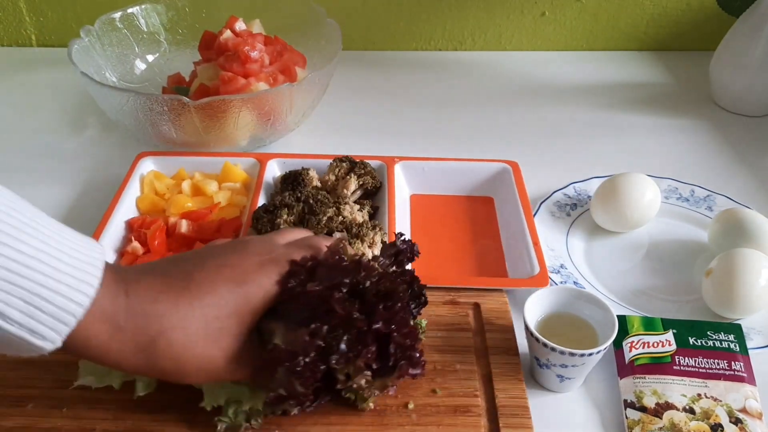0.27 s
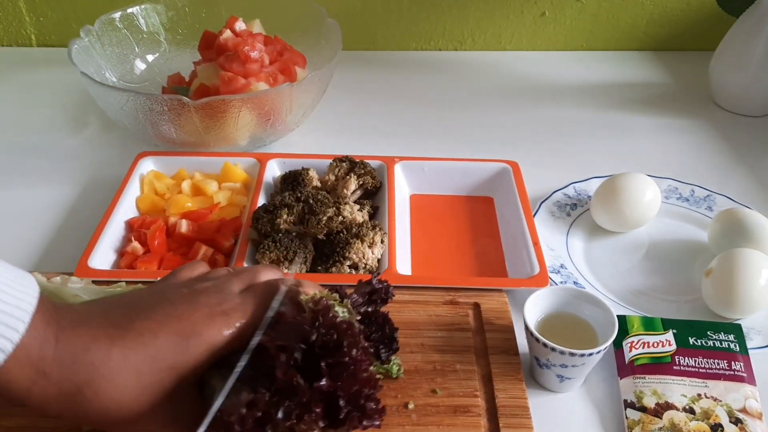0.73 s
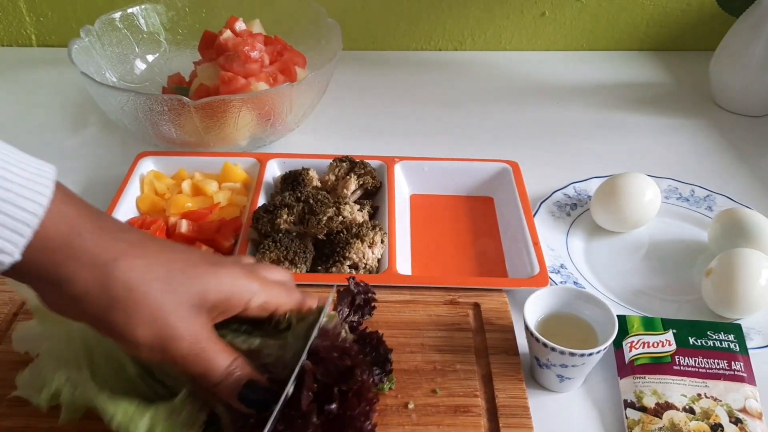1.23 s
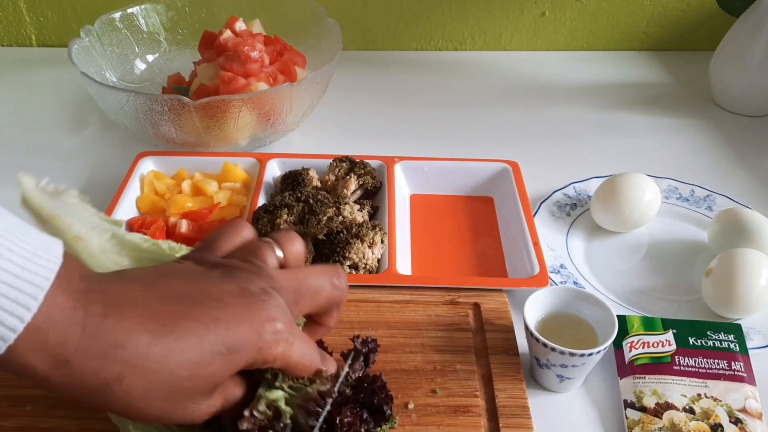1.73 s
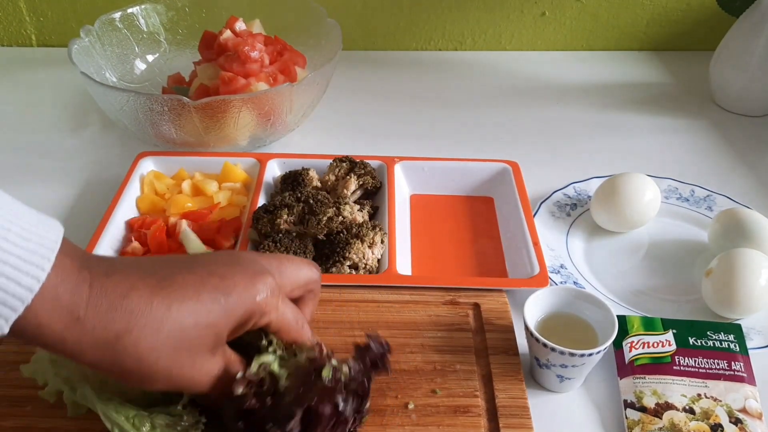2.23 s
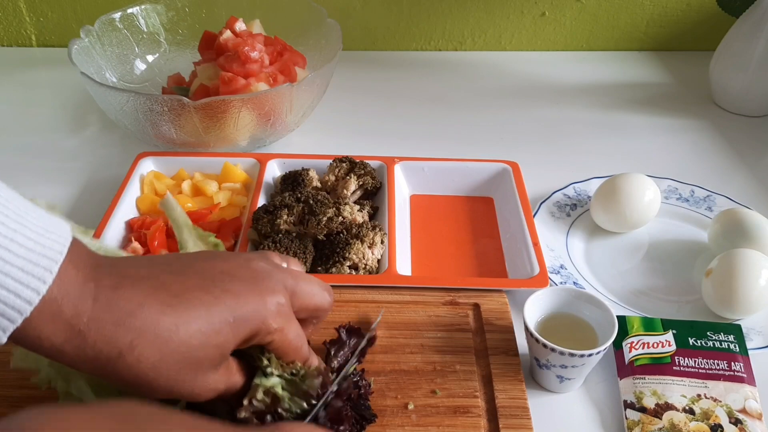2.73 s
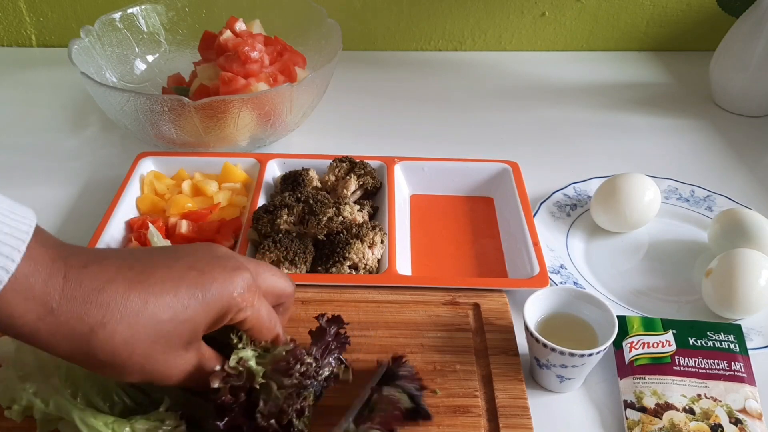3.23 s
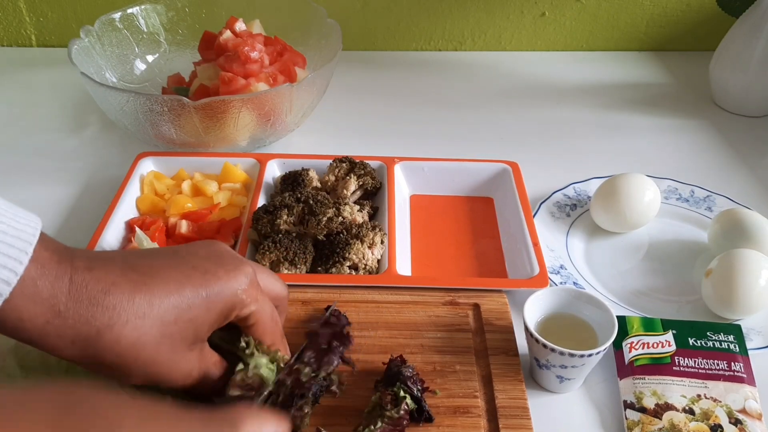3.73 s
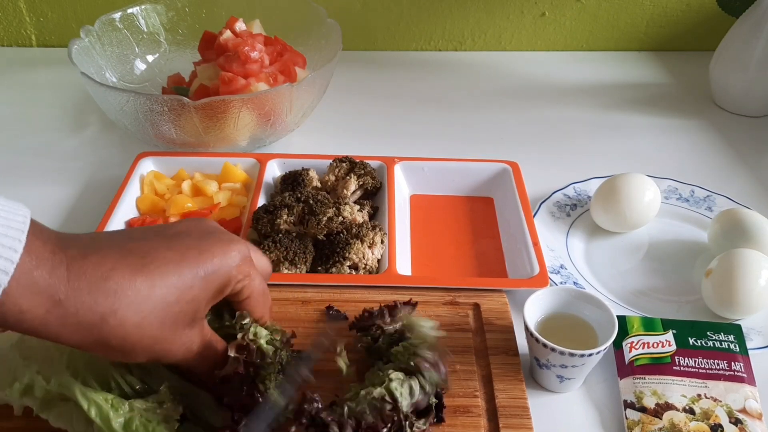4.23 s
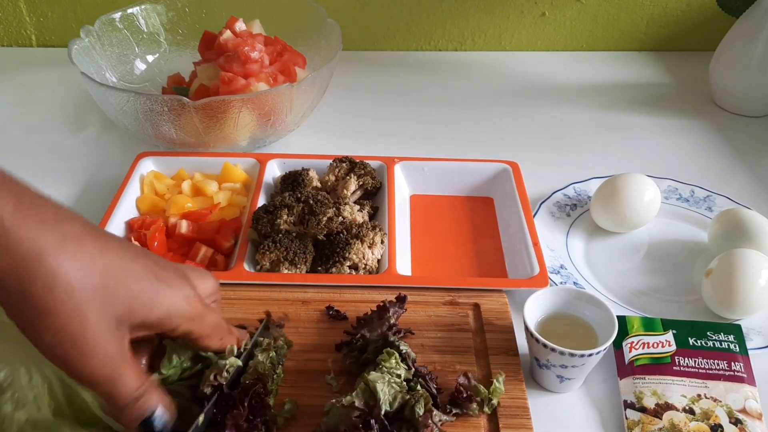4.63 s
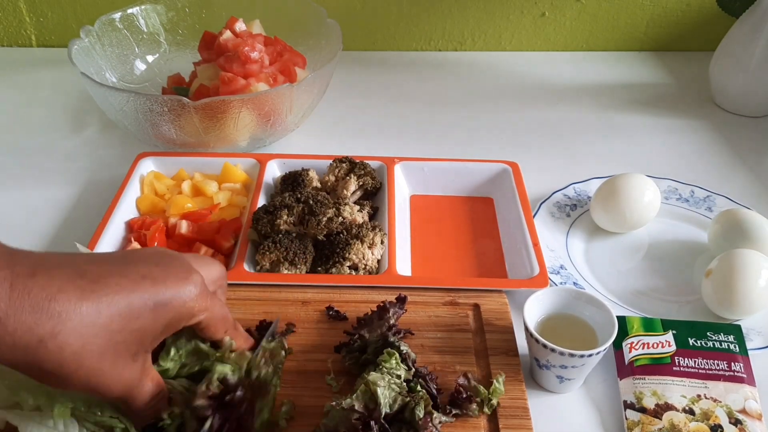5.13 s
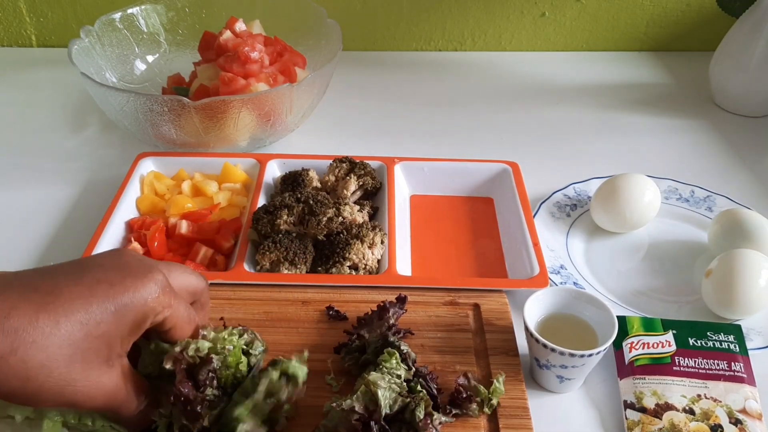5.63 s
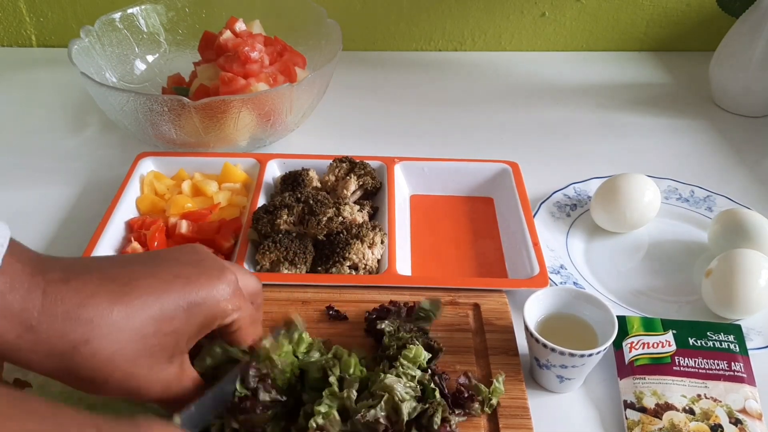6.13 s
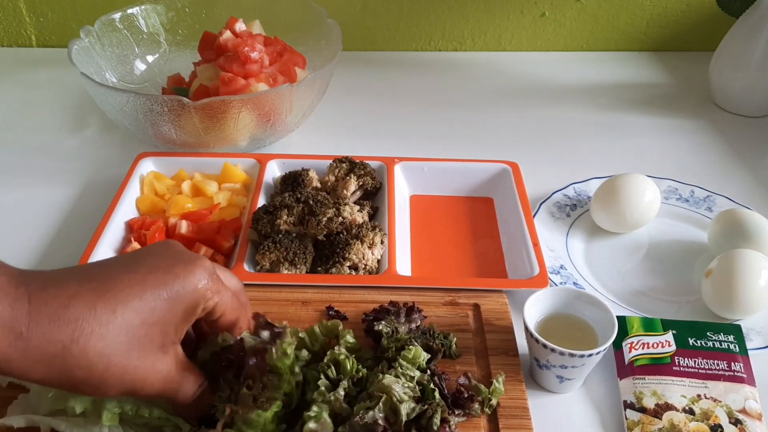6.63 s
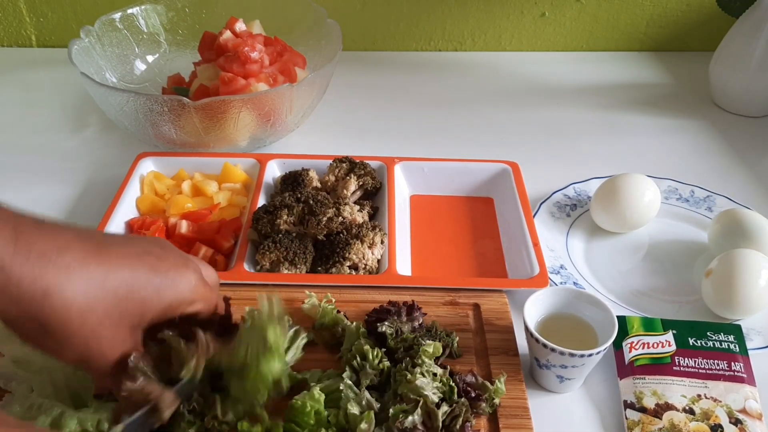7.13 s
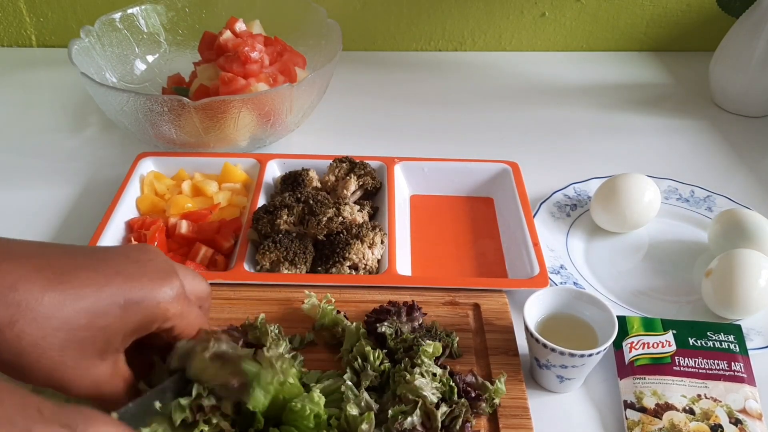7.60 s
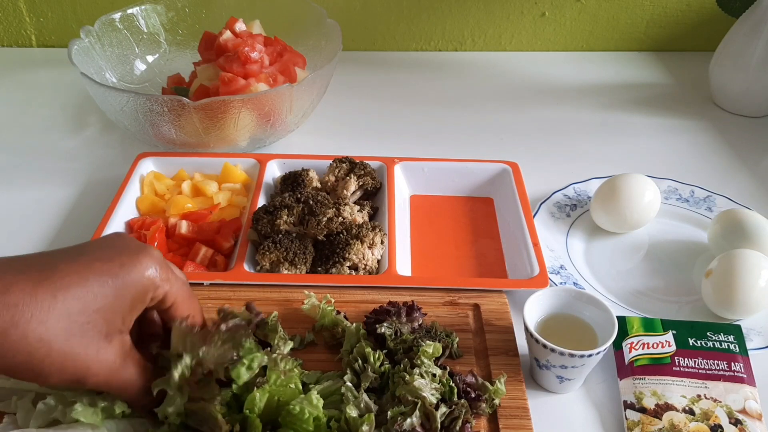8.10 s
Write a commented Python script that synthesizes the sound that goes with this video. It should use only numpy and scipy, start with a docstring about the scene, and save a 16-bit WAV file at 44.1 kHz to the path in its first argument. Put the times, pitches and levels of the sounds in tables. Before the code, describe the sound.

In a small kitchen, heard close in stereo with short bright reflections, a faint steady low appliance hum runs throughout, dipping briefly near 1 s. At 0.05-0.2 s a lettuce head lands on a wooden board: a fast cluster of hollow knocks, leaf crackle and a brief scrape. From 0.4 to 1.9 s come only soft rustles, light crunches and isolated ticks. Strokes strengthen from 2.1 s, crunchy at 2.9 s, with short blade rasps at 3.2 and 4.15 s and a hard clack on wood at 3.7 s, crunching again at 3.9 s. After a quieter stretch, quick crisp slices run from 4.9 to 6.6 s, snapping and tearing over dull board rumble, with a strong rasp at 5.9 s and dense crunch around 6.3-6.5 s. A short scrape at 6.87 s leads into near quiet and a very faint steel rub around 7.1 s. From 7.7 s, loud juicy stalk crunches peak near 8.1 s, then ease away.

```python
"""Slicing crisp lettuce

A head of lettuce is put down on a wooden board in a small kitchen and sliced with a knife.
Each stroke is a crackle of random clicks with snaps, ticks and tears, and a dull rumble of the board.
Blows ring the modes of the wood, the dragged blade rasps by stick and slip, wet leaves make it sing.
An appliance hums throughout, as drifting harmonics with one brief dip, over filtered noise for room air."""
import sys
import numpy as np
from scipy import signal
from scipy.fft import rfft, irfft
from scipy.io import wavfile
from scipy.ndimage import map_coordinates

SR = 44100
rng = np.random.default_rng(int(sys.argv[2]) if len(sys.argv) > 2 else 0)


def materialize(psi):
    """Save the field psi as 16-bit PCM at rate SR to the path in sys.argv[1].

    A 1-D psi becomes a single channel; in a 2-D psi each row is a channel.
    """
    bounded = np.clip(np.atleast_2d(psi).T, -1, 1)
    quanta = np.round(bounded * 32767).astype(np.int16)
    wavfile.write(sys.argv[1], SR, quanta)


N = 368676
TIME = np.arange(N) / SR

# Levels in the tables are relative: each source adds its own trim.
# the appliance motor: multiple_of_speed, level_db
MOTOR_HARMONICS = [(3, -72), (4, -64), (5, -68.5), (6, -49), (7, -71)]
MOTOR_HZ = 49.05   # mean speed
HUM_DIP_DB, HUM_DIP_AT_S, HUM_DIP_S = -3.5, 1.0, 0.34   # the hum dips briefly: depth, moment, half-length
# colour of the still room air: frequency_hz, level_db
AIR_COLOUR = [(25, -22), (50, -7), (110, -5.5), (200, 0), (330, 5.5), (450, -5), (700, -23.5),
              (1500, -21.5), (4000, -29.5), (9000, -26), (15000, -32.5)]

# decay of the kitchen: frequency_hz, t60_s
KITCHEN_DECAY = [(80, 0.23), (300, 0.48), (1000, 0.41), (3000, 0.4), (8000, 0.36), (15000, 0.24)]
EARLY_ECHO, EARLY_S = 1.5, 0.0055   # strength and fade of the first reflections off worktop, dishes and wall
LEFT_DB = 0.55   # the left is raised by this, the right lowered
CUTOFF_HZ = 15900
# spots along the blade, by the lag of their direct sound on the right: lag_s
SPOT_LAGS_S = [.00011, .00016, .0002]

# pushes of blade, hand or board into the leaves (the three moments are put in order of time):
# start_s, hardest_s, end_s, crisp_crackle_db, rib_crunch_db, board_rumble_db
STROKES = [(0.0, 0.006, 0.067, -54.5, -46.5, -70), (0.107, 0.124, 0.19, -39.5, -44, -63),
           (0.385, 0.46, 0.55, -65, -55.5, -69), (0.787, 0.824, 0.87, -64.5, -64, -76.5),
           (0.933, 1.071, 1.19, -60, -57, -74), (1.232, 1.293, 1.327, -55, -50.5, -74),
           (1.445, 1.477, 1.67, -55.5, -51, -64), (1.875, 1.919, 2.037, -50.5, -49, -55.5),
           (2.111, 2.246, 2.317, -55.5, -43, -58.5), (2.696, 2.758, 2.806, -48.5, -46.5, -48.5),
           (2.893, 2.941, 3.033, -44.5, -37, -53), (3.147, 3.229, 3.27, -58, -46.5, -55.5),
           (3.32, 3.37, 3.36, -63, -51.5, -66), (3.581, 3.623, 3.54, -48.5, -60, -72),
           (3.639, 3.695, 3.724, -42, -40, -46.5), (3.81, 3.896, 3.963, -40.5, -34.5, -50.5),
           (4.04, 4.11, 4.6, -61.5, -54.5, -59), (4.317, 4.412, 4.36, -65.5, -73, -78),
           (4.488, 4.555, 4.67, -52.5, -47, -71), (4.795, 4.849, 5.1, -59, -55.5, -69),
           (4.928, 5.033, 5.07, -43, -41.5, -48), (5.139, 5.19, 5.23, -42, -40, -49),
           (5.273, 5.375, 5.51, -46, -44.5, -54.5), (5.478, 5.508, 5.55, -43, -38, -61.5),
           (5.68, 5.73, 5.8, -44.5, -39, -58.5), (5.815, 5.857, 5.92, -54, -40.5, -64.5),
           (5.971, 6.0, 6.114, -57.5, -51, -68), (6.229, 6.242, 6.66, -45, -55, -61),
           (6.291, 6.336, 6.37, -37.5, -35.5, -46.5), (6.459, 6.546, 6.6, -36, -31, -47.5),
           (6.705, 6.768, 6.97, -56, -49, -56.5), (6.997, 7.058, 7.14, -67.5, -62, -67),
           (7.581, 7.592, 7.71, -59.5, -53, -67), (7.742, 7.809, 7.8, -42, -54, -61),
           (7.824, 7.888, 7.87, -35.5, -33.5, -43), (8.026, 8.066, 8.1, -37, -29, -60),
           (8.078, 8.115, 8.14, -36, -28.5, -46.5), (8.212, 8.322, 8.4, -56.5, -51.5, -59)]
# every stroke bites, swells to its hardest and eases off; then the leaves spring back and creak faintly to rest
BITE_S, SPRING_BACK_S, CREAK_DB, CREAK_S = 0.12, 0.046, -23.5, 0.34
# the thin outer leaves break from the start, the ribs only as the force builds
CRISP_SWELL_DB, CRISP_EASE_DB, RIBS_SWELL_DB, RIBS_EASE_DB = 6, 6, 9, 7.5
# the weight reaches the board a little later, swells to the hardest moment, then eases slightly
PRESS_LAG_S, PRESS_SWELL_DB, PRESS_EASE_DB = 0.016, 4, 1.5
HELD_CRISP_DB, HELD_RIBS_DB, HELD_RUMBLE_DB = -93.5, -87, -75   # the head merely held between strokes
# colour of the rumble through the board: frequency_hz, level_db
RUMBLE_COLOUR = [(25, -31), (50, -16.5), (68, -3.5), (90, -8.5), (118, 6.5), (150, -12), (220, -7.5),
                 (450, -8.5), (900, -33)]

# leaves sliding off the flat of the blade: start_s, hardest_s, end_s, level_db
WIPES = [(0.745, 0.785, 0.79, -69), (7.0, 7.08, 7.2985, -68)]
# modes of the thin singing steel: frequency_hz, width_hz, level_db
STEEL_MODES = [(4430, 250, -1), (6800, 64, -2)]

# scrapes across the wood, mostly the blade sweeping leaves aside:
# start_s, hardest_s, lift_off_s, rasp_db, hiss_db, late_board_drone_db, pitch_ratio
SWEEPS = [(0.0, 0.060, 0.090, -43, -62, -34, 1), (3.212, 3.238, 3.280, -28.5, -49, -35.5, 1),
          (4.146, 4.170, 4.204, -25, -50, -34, 1), (5.33, 5.39, 5.43, -42.5, -56, -52, .86),
          (5.655, 5.695, 5.72, -45.5, -64, -64, 1.5), (5.875, 5.899, 5.928, -20.5, -46, -39, 1.005),
          (6.852, 6.865, 6.884, -27.5, -54, -43, .98), (7.86, 7.90, 7.97, -40, -52, -48, .97)]
# resonances of the blade dragged on wood: frequency_hz, width_hz, level_db
BLADE_MODES = [(510, 150, -9), (730, 130, -7), (880, 65, 2.5), (1000, 60, 3.5), (1120, 100, -4),
               (1335, 60, 2), (1570, 200, -12), (2100, 300, -10.5), (2850, 300, -15), (3400, 400, -21)]
BLADE_BEND = 0.015   # the resonances rise by this share from no force to full force
GRAZE_S, GRAZE_FORCE = 0.035, 0.13   # the edge grazes the wood lightly before it digs in
DRONE_HZ, DRONE_WIDTH_HZ, DRONE_LAG_S = 323, 39, 0.024

# blows on the board: time_s, crack_db, wood_ring_db, crack_low_edge_hz, contact_cutoff_hz
KNOCKS = [(0.0552, -24.5, -34.5, 199, 1050), (0.0948, -8, -28.5, 349, 2000), (0.112, -14, -35.5, 300, 9400),
          (0.1241, -6.5, -26, 218, 1600), (0.1377, -9, -26.5, 200, 520), (0.1726, -16, -20, 200, 240),
          (3.705, -9, -17.5, 200, 70), (8.307, -30, -63, 900, 1210)]
# modes of the board on the worktop: frequency_hz, level_db, t60_s
BOARD_MODES = [(117, -5, .23), (167, -8, .38), (208, -8, .36), (242, -3, .36), (312, 2, .25), (361, -7, .4),
               (450, -6, .26), (590, -9, .26), (662, -3, .3), (712, -6, .28), (851, -11, .6),
               (953, -11, .22), (1090, -7, .24), (1487, -12, .8), (1945, -10, .25)]
RING_LOW_HZ = 93   # low edge of the ringing wood
# colour of a blow's crack: frequency_hz, level_db
CRACK_COLOUR = [(30, -32), (75, -21), (200, -5), (330, 3.5), (1000, 3.5), (1500, -4.5), (2600, -7.5),
                (4000, -8.5), (8000, -17.5), (15000, -16)]
# the blade chops through onto the wood once: moment, burst strength and band of the clack
CHOP_S, CHOP_DB, CHOP_LOW_HZ, CHOP_HIGH_HZ = 3.7046, 10.5, 1090, 2300

# snaps and a few sharp ticks: time_s, peak_db, middle_against_treble_db
SNAPS_AND_TICKS = [(0.099, -27.5, 3.5), (0.528, -50.5, 11), (1.291, -42, 7), (1.377, -36.5, -8),
                   (1.5485, -36.5, -10), (1.634, -35, 0), (1.825, -42.5, -20), (1.85, -35.5, -22),
                   (2.117, -57, 12), (2.7045, -30.5, -20), (3.028, -35, -11), (3.3248, -39, 2),
                   (3.371, -35, -15), (3.588, -38, -21), (3.6122, -28.5, -16), (3.6729, -26, -0.5),
                   (3.991, -30, -4), (4.5567, -29.5, 5), (5.229, -27.5, 4.5), (5.479, -31.5, -3),
                   (6.2228, -33.5, -10), (6.763, -32, -13), (7.582, -39.5, -1), (7.655, -41.5, -2),
                   (7.7215, -28.5, -16), (7.87, -25, -8), (8.0077, -31, 5.5), (8.0487, -22, 3)]
# thin ribs snap at random: peak above the crackle, highest peak, middle against treble and its spread
THIN_OVER_DB, THIN_TOP_DB, THIN_MIDDLE_DB, THIN_SPREAD_DB = 13.5, -35.5, -3, 3.5
# fibre bundles tear, each at its own pitch: energy above the crunch, its spread, its limit before spread, decay
TEAR_OVER_DB, TEAR_SPREAD_DB, TEAR_TOP_DB, TEAR_S = 21.5, 7, -14, 0.0054
TEAR_LOW_HZ, TEAR_HIGH_HZ, TEAR_WIDTH_HZ = 1100, 2700, 480

# how near the cut is to the thick, juicy stalk: time_s, share_0_to_1
STALK_NEARNESS = [(2.3, 0.17), (2.9, 0.31), (6.9, 0.42), (7.8, 0.6), (7.93, 0.4), (8.05, 0.94),
                  (8.14, 0.97), (8.3, 0.25)]
STALK_HZ, STALK_WIDTH_HZ = 2346, 2070
# colour of the thin, crisp leaves: frequency_hz, density_db_per_hz
CRISP_COLOUR = [(600, -25.5), (2000, -5), (4000, -1), (5500, -3), (8000, -6.5), (12000, -6), (15000, -12)]
# colour of the ribs: frequency_hz, density_db_per_hz
RIBS_COLOUR = [(120, -19.5), (300, -2), (520, -6), (900, -1), (1500, 2.5), (2200, 3), (3500, -5),
               (6000, -21.5), (14000, -41)]


def from_db(db):
    """Logarithmic level: decibels to amplitude gain."""
    return 10 ** (np.asarray(db) / 20)


def rms_one(x):
    """Normalisation of mean power: scale to rms 1."""
    return x / np.sqrt(np.mean(x ** 2) + 1e-20)


def at_hz(points, hz):
    """Linear interpolation of a table on a logarithmic frequency axis."""
    f, value = np.transpose(points)
    return np.interp(np.log(np.maximum(hz, 1)), np.log(f), value)


def drift(rate_hz):
    """Slow random modulation: normal values of spread 1, `rate_hz` a second, joined by straight lines."""
    return np.interp(TIME * rate_hz, np.arange(8192), rng.standard_normal(8192))


def colour(x, spectrum, size=4096):
    """Minimum-phase filtering: a causal response of unit energy, folded from the cepstrum of a spectrum."""
    magnitude = from_db(at_hz(spectrum, np.fft.rfftfreq(size, 1 / SR)))
    cepstrum = irfft(np.log(magnitude))
    cepstrum[1:size // 2] *= 2
    cepstrum[size // 2 + 1:] = 0
    response = irfft(np.exp(rfft(cepstrum)))
    return signal.oaconvolve(x, response / np.linalg.norm(response))[:N]


def resonance(x, hz, width_hz):
    """Damped oscillator: a two-pole band-pass with gain 1 on top."""
    r = np.exp(-np.pi * width_hz / SR)
    zeros = np.array([1, 0, -1]) * (1 - r * r) / 2
    poles = [1, -2 * r * np.cos(2 * np.pi * hz / SR), r * r]
    return signal.lfilter(zeros, poles, x + 1e-18)


def grains(per_s, spread_db, size=N):
    """Random impulse process: clicks of very uneven size, rms 1 overall."""
    excess_db = spread_db * np.minimum(rng.exponential(1, size), 4)
    sizes = from_db(excess_db) * rng.choice([-1, 1], size)
    occurs = rng.random(size) < per_s / SR
    # dividing by the root of the rate keeps the power alike for sparse and dense clicks
    return rms_one(sizes * occurs / np.sqrt(per_s))


def burst(decay_s, scatter, size=2048):
    """Impulsive excitation: one click, then a quickly dying scatter of noise; unit energy."""
    x = scatter * rng.standard_normal(size) * np.exp(-np.arange(size) / (decay_s * SR))
    x[0] = 1
    return x / np.linalg.norm(x)


def add(track, s, sound):
    """Superposition: mix a sound into the track at time s."""
    i = max(round(s * SR), 0)
    track[i:i + len(sound)] += sound[:N - i]


def in_kitchen(x, room_db, lag_s, size=32768):
    """Precedence and diffuse decay: the right hears later; reflections are alike on both sides only in the bass."""
    t, edges = TIME[:size], np.geomspace(40, 18000, 14)
    f = np.fft.rfftfreq(size, 1 / SR)
    alike = 0.98 / (1 + (f / 560) ** 2)
    mid, side = rfft(rng.standard_normal((2, size)))
    diffuse = np.sqrt((1 + alike) / 2) * mid + np.sqrt((1 - alike) / 2) * side * [[1], [-1]]
    early = (1 + EARLY_ECHO * np.exp(-t / EARLY_S)) * (t > 1 / 2000)
    tail = 0
    for low, high in zip(edges, edges[1:]):
        fade = early * from_db(-60 * t / at_hz(KITCHEN_DECAY, np.sqrt(low * high)))
        band = irfft(diffuse * (f >= low) * (f < high))
        tail = tail + band * fade / np.linalg.norm(fade)
    direct = np.array([x, np.interp(TIME - round(lag_s * SR) / SR, TIME, x)])
    reflected = signal.oaconvolve(x[None], tail, axes=1)[:, :N]
    wet = from_db(room_db)
    balance = from_db([[LEFT_DB], [-LEFT_DB]])
    return (direct + wet * reflected) / np.hypot(1, wet) * balance


def stroke_level(levels_db, held_db, swell_db, ease_db):
    """Force envelope: level in dB of a layer that follows the strokes, each at its own strength."""
    level = np.full(N, float(held_db))
    shape_db = [-60, -swell_db, 0, -ease_db, CREAK_DB, -60]
    for (start, hardest, end, *_), db in zip(STROKES, levels_db):
        sprung = end + SPRING_BACK_S
        moments = np.sort([start - BITE_S, start, hardest, end, sprung, sprung + CREAK_S])
        level = np.maximum(level, db + np.interp(TIME, moments, shape_db))
    return level


def leaf_levels():
    """Common excitation: crisp crackle and rib crunch in dB, both driven by the strokes."""
    *_, crisp_db, ribs_db, _ = np.transpose(STROKES)
    crisp = stroke_level(crisp_db, HELD_CRISP_DB, CRISP_SWELL_DB, CRISP_EASE_DB)
    ribs = stroke_level(ribs_db, HELD_RIBS_DB, RIBS_SWELL_DB, RIBS_EASE_DB)
    return crisp, ribs


def appliance():
    """Harmonic series of a rotating motor: a hum with one strong overtone, over still room air."""
    turns = np.cumsum(MOTOR_HZ * (1 + 0.0013 * drift(3.19))) / SR
    hum = 0
    for multiple, db in MOTOR_HARMONICS:
        gain = from_db(db + 0.5 * drift(3.4)) * np.sqrt(2)
        hum = hum + gain * np.sin(2 * np.pi * (round(multiple) * turns + rng.random()))
    dip = from_db(HUM_DIP_DB * np.exp(-((TIME - HUM_DIP_AT_S) / HUM_DIP_S) ** 2))
    air = colour(rng.standard_normal(N), AIR_COLOUR)
    sides = from_db([[-0.3], [0.3]])
    return hum * dip * sides + from_db(-61.0) * in_kitchen(air, room_db=17.0, lag_s=0)


def pressing():
    """Structure-borne sound: the uneven give of the leaves passes through the board as a low rumble."""
    *_, strokes_db = np.transpose(STROKES)
    level_db = stroke_level(strokes_db, HELD_RUMBLE_DB, PRESS_SWELL_DB, PRESS_EASE_DB)
    rumble_db = np.interp(TIME - PRESS_LAG_S, TIME, level_db)
    give = grains(per_s=600, spread_db=1.5) * from_db(rumble_db)
    return in_kitchen(colour(give, RUMBLE_COLOUR), room_db=-14, lag_s=0.0001)


def wipes():
    """Friction-driven resonance: wet leaves rub along the blade and make the steel sing."""
    force = sum(from_db(db) * np.interp(TIME, [start, hardest, end], [0, 1, 0])
                for start, hardest, end, db in WIPES)
    rubbing = rng.standard_normal(N)
    steel = rms_one(sum(from_db(db) * resonance(rubbing, hz, width) for hz, width, db in STEEL_MODES))
    return in_kitchen(force * steel, room_db=0, lag_s=0.00016)


def sweeps(size=16384):
    """Stick-slip friction: the edge rasps across the grain, its pitch set by grip and force; the board drones late."""
    out, t = 0, TIME[:size]
    for lag_s in SPOT_LAGS_S:
        wood, hiss = np.zeros((2, N))
        for start, hardest, lift, rasp_db, hiss_db, drone_db, pitch in SWEEPS:
            touch = start - GRAZE_S
            force = np.interp(max(touch, 0) + t, [touch, start, hardest, lift], [0, GRAZE_FORCE, 1, 0])
            slips = grains(per_s=1200, spread_db=3.0, size=size) * from_db(2.5 * drift(130)[:size])
            # neighbouring modes have opposite sign
            blade = rms_one(sum((-1) ** k * from_db(db) * resonance(slips, hz, width)
                                for k, (hz, width, db) in enumerate(BLADE_MODES)))
            # reading faster or slower shifts all the resonances together
            blade = map_coordinates(blade, [np.cumsum(pitch * (1 + BLADE_BEND * (force - 1)))])
            board = resonance(slips, DRONE_HZ, DRONE_WIDTH_HZ)
            board = rms_one(resonance(board, DRONE_HZ, 3 * DRONE_WIDTH_HZ))
            late_force = np.interp(t - DRONE_LAG_S, t, force)
            rasp = from_db(rasp_db - 3.0) * force * blade
            drone = from_db(drone_db - 1.0) * late_force * board
            add(wood, touch, rasp + drone)
            add(hiss, touch, from_db(hiss_db - 3.0) * force * slips)
        out = out + in_kitchen(wood + colour(hiss, CRISP_COLOUR), room_db=0, lag_s=lag_s)
    return out


def chop():
    """Band-limited impact: the edge breaks through a rib and lands on the wood with one short, hard clack."""
    clack = np.zeros(N)
    band = signal.butter(2, [CHOP_LOW_HZ, CHOP_HIGH_HZ], "band", fs=SR, output="sos")
    add(clack, CHOP_S, from_db(CHOP_DB) * signal.sosfilt(band, burst(decay_s=0.003, scatter=0.12)))
    return in_kitchen(clack, room_db=-1, lag_s=0)


def knocks():
    """Modal impact: each blow cracks briefly and rings the board; soft contacts are dull, light ones thin."""
    cracks, rings, t = np.zeros(N), np.zeros(N), TIME[:SR]
    for s, crack_db, ring_db, low_hz, contact_hz in KNOCKS:
        soft = signal.butter(1, min(contact_hz, 0.4 * SR), fs=SR)
        light = signal.butter(1, low_hz, "high", fs=SR)
        crack = signal.lfilter(*light, burst(decay_s=0.005, scatter=0.085))
        ring = sum((-1) ** k * from_db(db - 60 * t / t60) * np.sin(2 * np.pi * hz * t)
                   for k, (hz, db, t60) in enumerate(BOARD_MODES))
        dull_ring = signal.lfilter(*soft, signal.lfilter(*soft, ring))
        add(cracks, s, from_db(crack_db + 20.0) * signal.lfilter(*soft, crack))
        add(rings, s, from_db(ring_db) * dull_ring)
    ringing = signal.lfilter(*signal.butter(2, RING_LOW_HZ, "high", fs=SR), rings)
    wood = in_kitchen(ringing, room_db=-2.0, lag_s=0.00003)
    return wood + in_kitchen(colour(cracks, CRACK_COLOUR), room_db=3, lag_s=0.00003)


def thin_snaps(count=60):
    """Random fracture: small snaps that follow the crackle's level at their moment; rows as in SNAPS_AND_TICKS."""
    when, fullness = rng.random((count, 2)).T
    s = when * TIME[-1]
    crackle_db = np.interp(s, TIME, leaf_levels()[0])
    peak_db = np.minimum(crackle_db + THIN_OVER_DB, THIN_TOP_DB)
    return list(zip(s, peak_db, THIN_MIDDLE_DB + THIN_SPREAD_DB * (2 * fullness - 1)))


def snaps():
    """Impulsive release: snaps and a few sharp ticks, each over in a few milliseconds."""
    sharp, full = np.zeros(N), np.zeros(N)
    for s, db, middle_db in list(SNAPS_AND_TICKS) + thin_snaps():
        add(sharp, s, from_db(db + 13.0) * burst(decay_s=0.00064, scatter=0.22))
        add(full, s, from_db(db + middle_db + 15.5) * burst(decay_s=0.0011, scatter=0.41))
    return in_kitchen(colour(sharp, CRISP_COLOUR) + colour(full, RIBS_COLOUR), room_db=-3, lag_s=0.00016)


def tears(count=240):
    """Resonant fracture: little runs of cracks as fibre bundles part make the crunch lumpy."""
    out, ribs_db = np.zeros(N), leaf_levels()[1]
    for when, pitch, strength in rng.random((count, 3)):
        i = int(when * N)
        hz = TEAR_LOW_HZ * (TEAR_HIGH_HZ / TEAR_LOW_HZ) ** pitch
        run = resonance(burst(decay_s=TEAR_S, scatter=1), hz, TEAR_WIDTH_HZ)
        run = resonance(run, hz, hz)
        db = min(ribs_db[i] + TEAR_OVER_DB, TEAR_TOP_DB) + TEAR_SPREAD_DB * (2 * strength - 1)
        add(out, TIME[i], from_db(db - 3.0) * run / np.linalg.norm(run))
    return in_kitchen(out, room_db=-1, lag_s=0.00016)


def crunch():
    """Random cell rupture: clumped bursts along the blade, single ticks when light, a dense crackle when hard."""
    crisp_db, ribs_db = leaf_levels()
    stalk = np.interp(TIME, *np.transpose(STALK_NEARNESS))
    per_s = 800 * from_db(0.55 * (np.maximum(crisp_db, -68) + 48))   # harder strokes burst more cells
    clumps = from_db(2.4 * drift(160) + 1.2 * drift(35) - 0.3)
    crisp_gain = clumps * from_db(crisp_db - 2.0 - 2.6 * stalk)
    ribs_gain = clumps * from_db(ribs_db - 3.5)
    out = 0
    for lag_s in SPOT_LAGS_S:
        cells, fibres = grains(per_s, spread_db=4.5), grains(per_s, spread_db=4.5)
        splits = (0.6 * cells + 0.8 * fibres) * ribs_gain
        # thin ribs crunch broadly; the turgid stalk bites in a higher, narrower band
        bite = resonance(splits * stalk, STALK_HZ, STALK_WIDTH_HZ)
        bite = resonance(bite, STALK_HZ, 2 * STALK_WIDTH_HZ)
        crisp = colour(cells * crisp_gain, CRISP_COLOUR)
        ribs = colour(splits * from_db(-4 * stalk), RIBS_COLOUR)
        out = out + in_kitchen(crisp + ribs + from_db(10.0) * bite, room_db=1, lag_s=lag_s)
    return out


def scene():
    """Superposition of the humming kitchen, board, knife and lettuce."""
    background = appliance() + pressing()
    blade_and_board = wipes() + sweeps() + chop() + knocks()
    lettuce = snaps() + tears() + crunch()
    return background + blade_and_board + lettuce


def record(dry):
    """Band limitation: an elliptic low-pass cuts the top steeply."""
    return signal.sosfilt(signal.ellip(10, 0.2, 80, CUTOFF_HZ, fs=SR, output="sos"), dry)


dry = scene()
out = record(dry)
materialize(out)
```